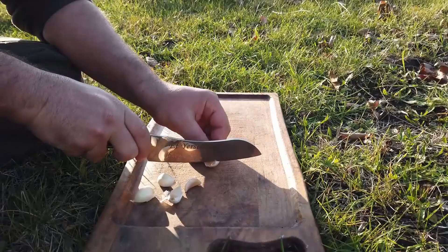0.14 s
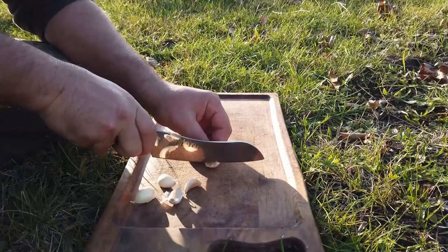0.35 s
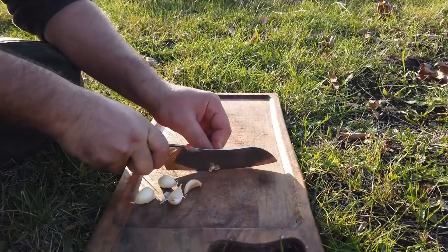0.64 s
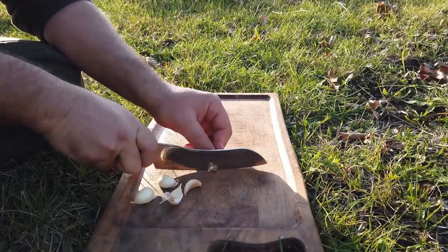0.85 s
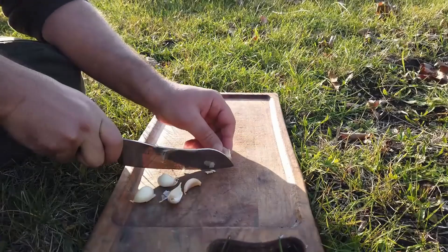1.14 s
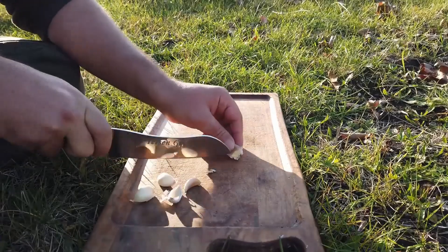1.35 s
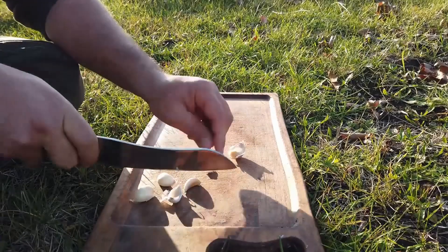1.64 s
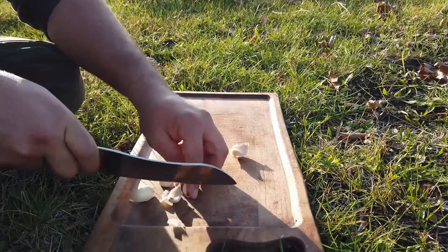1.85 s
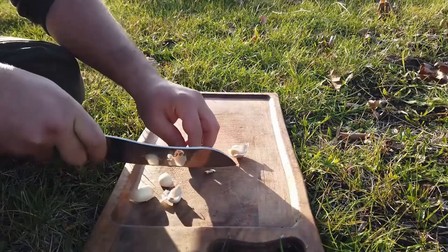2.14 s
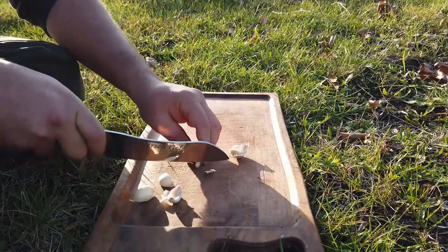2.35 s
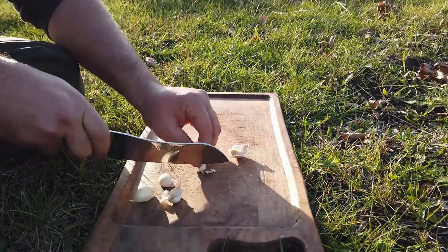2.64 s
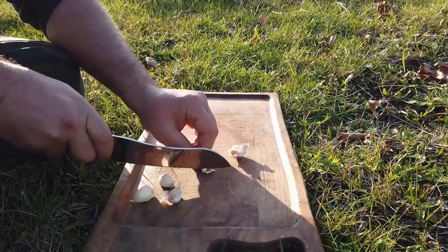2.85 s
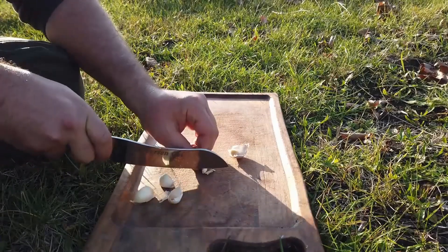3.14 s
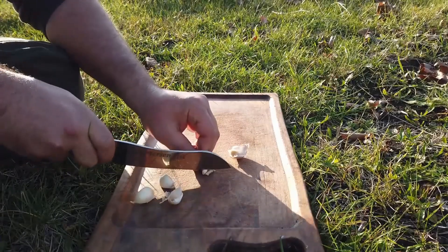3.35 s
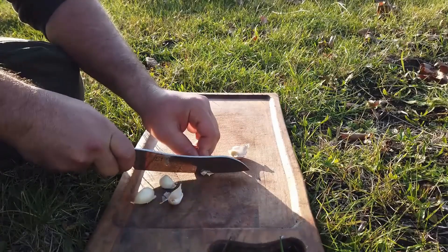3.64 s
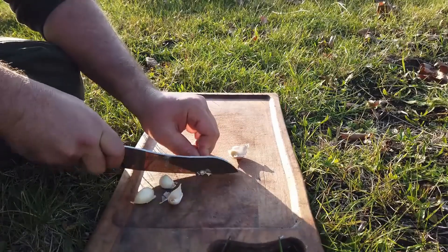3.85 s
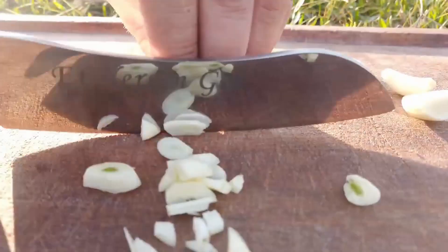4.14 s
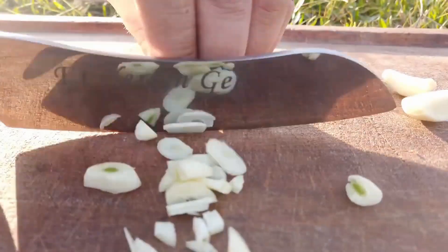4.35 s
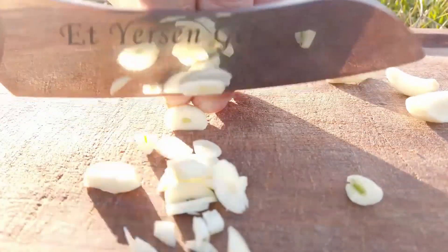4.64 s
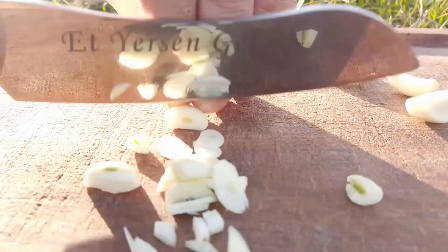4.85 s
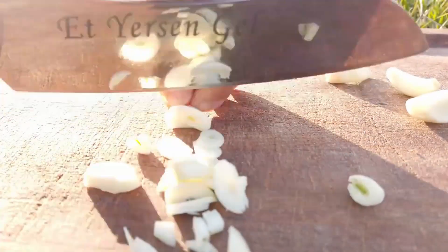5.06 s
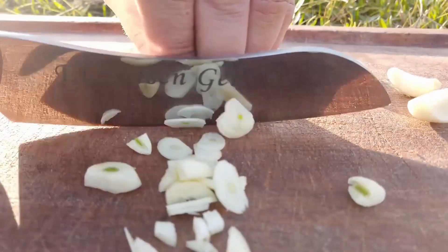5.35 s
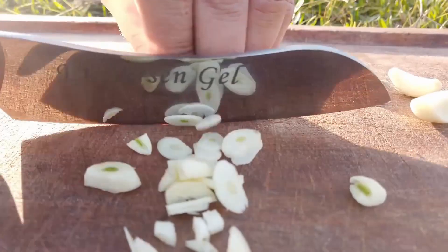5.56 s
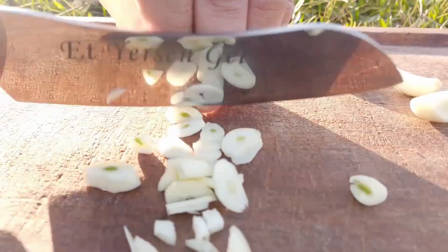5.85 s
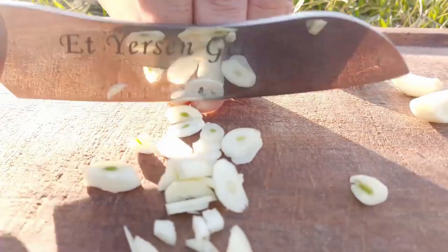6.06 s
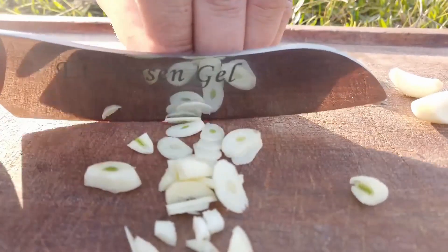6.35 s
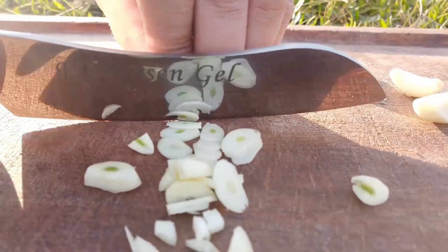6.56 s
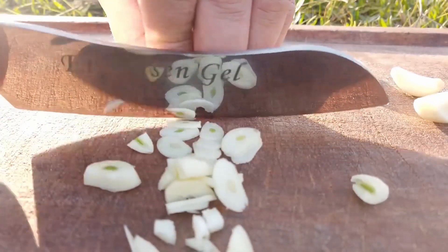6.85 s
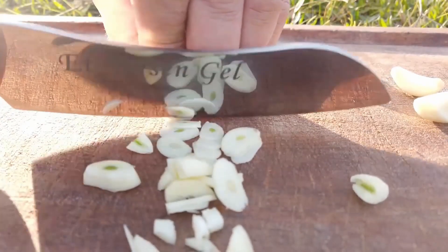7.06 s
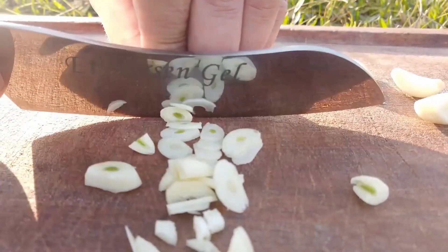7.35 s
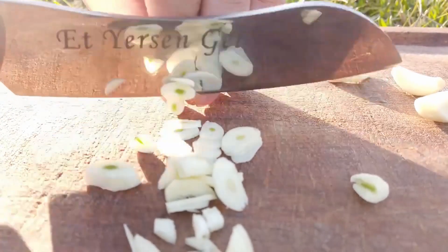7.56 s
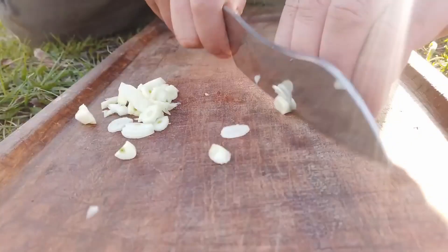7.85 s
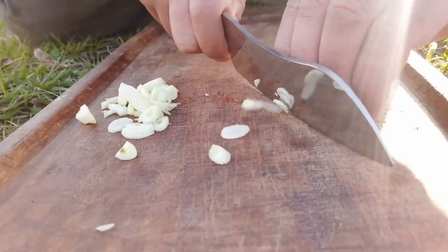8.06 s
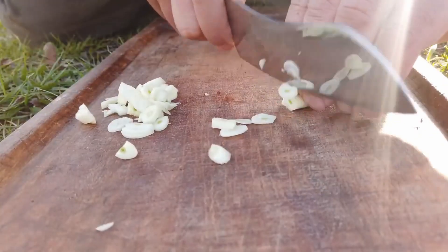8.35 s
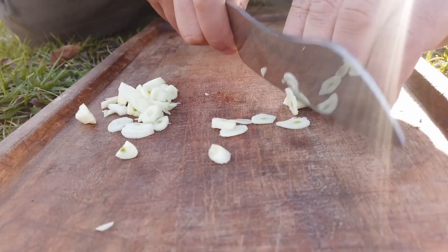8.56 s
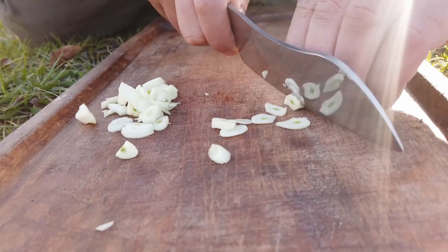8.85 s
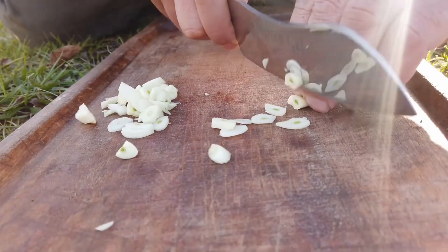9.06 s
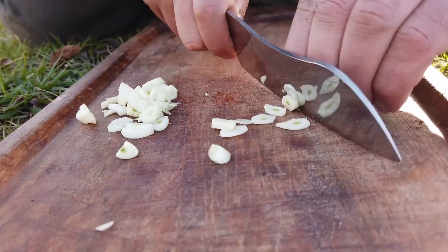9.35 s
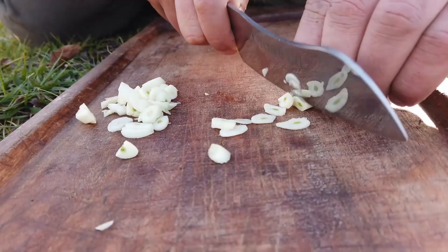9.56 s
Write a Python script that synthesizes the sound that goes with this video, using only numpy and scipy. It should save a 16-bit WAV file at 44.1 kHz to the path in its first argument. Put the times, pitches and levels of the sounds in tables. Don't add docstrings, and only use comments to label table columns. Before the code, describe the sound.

A knife trims garlic with snaps and soft scrapes on a wooden board outdoors, then chops steadily with crisp, hollow knocks over rumbling wind.

```python
import sys
import numpy as np
from scipy import signal
from scipy.fft import rfft, irfft
from scipy.io import wavfile
from scipy.ndimage import uniform_filter1d

SR = 44100
rng = np.random.default_rng(int(sys.argv[2]) if len(sys.argv) > 2 else 0)


def digitize_waveform(pressure):
    field = np.atleast_2d(pressure).T
    bounded = np.clip(field, -1, 1)
    quanta = np.round(bounded * 32767).astype(np.int16)
    wavfile.write(sys.argv[1], SR, quanta)


def invert_db(level):
    return 10 ** (np.asarray(level, dtype=float) / 20)


N = 427769
T = np.arange(N) / SR


def rms_one(x):
    return x / np.sqrt(np.mean(x ** 2) + 1e-20)


def in_time(rows, outside=None):
    s, *columns = np.transpose(rows)
    return [np.interp(T, s, column, outside, outside) for column in columns]


def band(x, low_hz, high_hz, order=2):
    return signal.sosfilt(signal.butter(order, [low_hz, high_hz], "band", fs=SR, output="sos"), x)


def noise_band(low_hz, high_hz, order=2):
    return rms_one(band(rng.standard_normal(N + SR), low_hz, high_hz, order=order)[SR:])


def drift(rate):
    points = rng.standard_normal(400)
    return np.interp(T * rate % 399, np.arange(400), points)


def marks(times, heights):
    out = np.full(N, 1e-18)
    np.add.at(out, np.round(np.asarray(times) * SR).astype(int), heights)
    return out


def dying(clicks, t60):
    return signal.lfilter([1], [1, -invert_db(-60 / (t60 * SR))], clicks)


def resonate(x, peaks):
    out = 0
    for k, (hz, width, level_db) in enumerate(peaks):
        r = np.exp(-np.pi * width / SR)
        rise = [(1 - r * r) / 2, 0, (r * r - 1) / 2]
        ring = signal.lfilter(rise, [1, -2 * r * np.cos(2 * np.pi * hz / SR), r * r], x)
        out = out + (-1) ** k * invert_db(level_db) * ring
    return out


def grains(per_s, spread_db):
    sizes = invert_db(spread_db * np.minimum(rng.exponential(1, N), 4)) * rng.choice([-1, 1], N)
    return rms_one(sizes * (rng.random(N) < per_s / SR))


def friction(source, dull, bright, body):
    parts = []
    for envelope, peaks in zip((dull, bright), body):
        ring = resonate(source * envelope + 1e-18, peaks)
        parts.append(ring / np.std(resonate(source[:SR], peaks)))
    return band(parts[0], 280, 3500, order=4) + parts[1]


def bursts(rows):
    dull, bright, after = np.zeros(N), np.zeros(N), np.arange(4000) / SR
    for s, peak_db, bright_db in rows:
        t60 = 0.026 - .0007 * np.clip(bright_db, -15, 15)
        start = round(s * SR)
        fall = invert_db(peak_db - 10.5 - 60 * after / t60) * np.minimum(after / 0.0015, 1)
        dull[start:start + len(after)] += fall
        bright[start:start + len(after)] += fall * invert_db(bright_db)
    return dull, bright


# time in seconds, level in dB.
AIR = [(0, -62), (1.5, -62.5), (4.17, -63.5), (4.19, -72), (9.7, -72.5)]
# pitch in Hz, level in dB per Hz.
HISS_COLOUR = [(300, -13), (500, -10.5), (800, -9), (1200, -15.5), (2000, -19), (4000, -22.5),
               (6500, -21.5), (10000, -30), (15500, -30.5)]


def air():
    hz = np.maximum(np.fft.rfftfreq(N, 1 / SR), 1)
    colour_hz, colour_db = np.transpose(HISS_COLOUR)
    gain = invert_db(np.interp(np.log(hz), np.log(colour_hz), colour_db)) * (hz > 300)
    hiss = rms_one(irfft(rfft(rng.standard_normal(N)) * gain, N))
    return hiss * invert_db(in_time(AIR)[0])


# time in seconds, level in dB.
ROAD = [(0, -43), (.35, -43), (.6, -46), (.9, -42), (1.1, -49.5), (1.4, -44), (2.5, -49.5), (2.92, -57),
        (3.32, -52), (3.67, -62), (3.94, -54), (4.5, -59.5), (7, -61), (7.94, -49.5), (8.3, -54),
        (8.67, -58), (9.5, -53.5)]
# time in seconds, level in dB.
TYRES = [(0, -88), (1.0, -80), (1.4, -70), (2.3, -62), (2.9, -78), (3.7, -59), (4.3, -65.5), (7.6, -69),
         (8.6, -58), (9.7, -59)]


def traffic():
    road = noise_band(85, 165, order=3) * invert_db(in_time(ROAD)[0])
    return road + noise_band(130, 330) * invert_db(in_time(TYRES)[0])


SPOT_ENDS_S = [4.18, 7.7]
# time in seconds, level in dB.
WIND = [(0.0, -39.5), (0.35, -38), (1.0, -35.5), (1.38, -46.5), (1.84, -35.5), (2.48, -37), (2.65, -42),
        (2.92, -34.5), (3.32, -42.5), (3.8, -37.5), (4.24, -43.5), (4.51, -47.5), (5.0, -46.5),
        (5.65, -44.5), (7.73, -45), (8.67, -48.5), (8.86, -53.5), (9.35, -47)]
BUFFET_DB = [-29, -45, -44]


def wind():
    gust_db = in_time(WIND)[0]
    swing_db = gust_db - gust_db.mean()
    spot_db = np.take(BUFFET_DB, np.searchsorted(SPOT_ENDS_S, T))
    buffet = noise_band(1.97, 14) * invert_db(uniform_filter1d(spot_db, size=4000) + 0.27 * swing_db)
    throb = noise_band(15, 30) * invert_db(-50 + swing_db + 3.0 * drift(3))
    gust = noise_band(31, 67.8) * invert_db(gust_db + 0.63 * drift(9.2))
    opening_offset = -.075 * np.exp(-T / .004)
    return buffet + throb + gust + opening_offset


# middle in seconds, level in dB, quarter of the length in
# seconds.
RUSTLES = [(4.225, -67, .012), (4.435, -65.5, .01), (4.59, -69.5, .015), (4.634, -68, .01),
           (4.79, -67.5, 0.0099), (4.835, -67, .01), (4.993, -76, .012), (5.39, -75, 0.013),
           (5.64, -79, 0.0093), (7.403, -73.5, 0.038), (7.48, -73, 0.033), (7.765, -74.5, 0.011),
           (7.97, -71, 0.0077), (8.15, -69, 0.01), (8.509, -76, 0.009), (9.386, -74, 0.0094)]


def rustles():
    brushing = 0
    for s, level_db, half in RUSTLES:
        brushing = brushing + invert_db(level_db) * np.maximum(1 - np.abs(T - s) / (2 * half), 0)
    return brushing * noise_band(4300, 7000)


# pitch in Hz, width in Hz, level in dB.
SLIDE_RINGS = [(810, 120, -11), (1170, 110, 6.5), (1140, 64, 1.5), (1520, 80, -6)]
# time in seconds, level in dB.
SLIDING = [(7.71, -89), (7.725, -69.5), (7.95, -76), (8.1, -72), (8.8, -81), (8.95, -80), (9.15, -83.5),
           (9.5, -71.5), (9.7, -73)]


def sliding():
    rub = rms_one(resonate(rng.standard_normal(N), SLIDE_RINGS))
    return rub * invert_db(in_time(SLIDING, -150)[0] + 2.0 * drift(12))


# time in seconds, peak in dB,
# pitch in Hz, width in Hz.
TICKS = [(.5075, -44, 3200, 900), (.5415, -52, 6000, 3000), (.5515, -31, 420, 120), (.5517, -26, 1780, 260),
         (.5518, -29, 5000, 700), (.5785, -44, 1500, 900), (.6452, -28, 3300, 400),
         (.6453, -28, 6200, 1500), (.678, -48, 7000, 4000), (.682, -50, 11000, 4000),
         (.697, -46, 11500, 3500), (.7008, -42, 10500, 5000), (.7118, -46, 9000, 5000),
         (.7188, -38, 8000, 4000), (.7303, -33, 6000, 4000), (.7335, -38, 11500, 5000),
         (.8965, -46, 7500, 1500), (.9152, -38, 7700, 500), (1.0505, -40, 10000, 4000),
         (1.066, -38, 5800, 900), (1.078, -44, 9000, 3000), (1.104, -40, 5700, 900),
         (1.153, -48, 7000, 1500), (2.065, -36, 1200, 200), (2.067, -38, 650, 150), (2.129, -48, 1280, 90),
         (2.213, -46, 820, 150), (2.331, -42, 1110, 70), (2.354, -40, 850, 90), (2.4468, -28, 1750, 350),
         (2.447, -32, 860, 120), (2.448, -34, 2700, 700), (2.488, -40, 850, 50), (2.594, -48, 1100, 70),
         (3.6478, -34, 1800, 400), (3.6728, -30, 1750, 300), (3.673, -40, 4800, 1500),
         (3.8425, -44, 7700, 400), (3.8755, -46, 8000, 4000), (4.022, -48, 9500, 3000),
         (4.0296, -34, 5000, 900), (4.2375, -36, 1300, 700), (5.293, -48, 1300, 900), (8.225, -57, 800, 90),
         (8.242, -55, 850, 70), (8.418, -52, 850, 120),
         (.9152, -36, 4500, 1200), (.9155, -40, 1750, 300), (.633, -42, 6300, 2500), (3.85, -40, 450, 250),
          (4.03, -36, 1100, 700), (6.2625, -40, 5200, 2500), (6.281, -42, 1500, 900), (7.85, -66, 1450, 25),
          (7.86, -66, 1080, 30), (8.06, -65, 1200, 25), (8.9055, -48, 7500, 3000), (8.8875, -42, 9500, 700),
          (9.008, -62, 1230, 40)]


def ticks():
    out, after = np.zeros(N), np.arange(3000) / SR
    for s, peak_db, hz, width in TICKS:
        shove = rng.standard_normal(len(after)) * np.exp(-after / .0012)
        ring = resonate(resonate(shove, [(hz, width, 0)]), [(hz, 3 * width, 0)])
        out[round(s * SR):][:len(after)] += invert_db(peak_db) * ring / np.abs(ring).max()
    return out


# pitch in Hz, width in Hz, level in dB.
BLADE = [
    [(545, 160, -10), (866, 44, -3.5), (980, 67, -9), (1120, 58, -3), (1272, 70, -5.5), (1717, 135, -2),
     (2680, 340, -19.5), (3120, 780, -21.5)],
    [(2540, 350, -0.5), (2950, 600, 2), (3423, 67, -1), (4065, 160, -15), (4750, 680, -1.5),
     (5910, 580, -2.5), (6270, 1500, -6), (7980, 480, -7), (9600, 900, -16), (12400, 2500, -35)],
]
# time in seconds, peak in dB, bright part in dB.
SNAPS = [(0.3202, -56, 13), (0.3484, -49.5, 8), (0.378, -48, 14), (0.4856, -45, 3), (0.5077, -40, 4),
         (0.5518, -14, -1), (0.5781, -29, -13), (0.591, -46, 8), (0.6435, -11.5, 4), (0.701, -37, 10),
         (0.717, -30, -2), (0.7309, -24, 7), (0.8959, -48, -5), (0.9128, -29.5, 8.5), (0.9837, -44, 5),
         (1.0503, -29.5, 8), (1.571, -53, 6), (1.9036, -47, -4), (2.0634, -34, -38), (2.2129, -44, -8),
         (2.355, -49, -25), (2.4484, -19, -30), (2.596, -45, -5), (3.1672, -47, -5), (3.6461, -23, -3),
         (3.6711, -22, -1), (3.8424, -24.5, -9), (3.8504, -29.5, 8), (4.0288, -20, 5), (4.1024, -35.5, -4)]
# start in seconds, length in seconds, level in dB, bright part in dB, fade in seconds per 20 dB.
STROKES = [(.28, .24, -69.5, -8, .05), (.535, .02, -62, -15, .04), (.64, .008, -33, -16, .04),
           (.66, .07, -52, 1, .04), (.74, .04, -64, -4, .15), (.94, .1, -51.5, -3, .06),
           (1.05, .06, -49, 3, .04), (1.12, .02, -55, -3, .3), (1.92, .17, -64, -25, .05),
           (2.12, .24, -56.5, -15, .03), (2.45, .02, -49, -30, .07), (2.54, .16, -67, -24, .05),
           (3.53, .12, -62, -4, .05), (3.675, .055, -41, -11, .022), (3.845, .015, -47, -5, .07),
           (3.83, .19, -59.5, -4, .03), (4.04, .065, -52, 0, .03), (4.115, .062, -56, -7, .02)]


def trimming():
    flutter = invert_db(2.0 * drift(45)) * (T < SPOT_ENDS_S[0])
    dull, bright = bursts(SNAPS)
    for start, length, level_db, bright_db, fade in STROKES:
        before = np.maximum((start - T) / .025, 0)
        away = before + np.maximum((T - start - length) / fade, 0)
        pressure = flutter * invert_db(level_db - 20 * np.minimum(away, 10))
        dull, bright = dull + pressure, bright + pressure * invert_db(bright_db)
    return friction(grains(9000, 3.6), dull, bright, BLADE)


FIRM_BLOW_DB, JUICY_DB = -8, -46
# pitch in Hz, width in Hz, level in dB.
CLOVE = [
    [(660, 250, 1), (1131, 190, -2.5), (1335, 196, 0.5), (1890, 280, -7), (430, 200, -8)],
    [(2374, 210, 1), (3020, 260, -7), (4170, 410, -4), (5140, 600, -1), (6160, 1140, -2.5),
     (7600, 1430, -10), (8670, 300, -8), (12000, 2100, -34), (3550, 300, -17)],
]
# time in seconds, peak in dB, bright part in dB.
SKINS = [(5.9944, -63.5, -7), (7.3312, -29, -9), (7.903, -66, -2), (8.6862, -53, 4), (8.8623, -47, -6.5),
         (8.88, -27, -7.5), (8.8864, -25, -0.5), (8.8934, -24, -5), (9.2214, -51, -0.5)]
# landing of the edge in seconds, blow in dB, high modes in dB,
# time in the clove in seconds, crackle in dB.
CHOPS_FRONT = [(4.2605, -10.5, -1, .0235, -42), (4.463, -7.5, 1.5, .02, -43.5),
               (4.6636, -9.5, 6, 0.021, -46), (4.869, -20.5, 11, .029, -43),
               (5.0638, -15.5, 6.5, .025, -44), (5.2644, -8, 2.5, .019, -42.5),
               (5.475, -10, 1.5, 0.02, -42.5), (5.682, -18.5, -1, .029, -43.5),
               (5.8662, -11, 7.5, .023, -50.5), (6.068, -8.5, 2, .02, -55), (6.289, -30, -7, .038, -48.5),
               (6.471, -16, 7, 0.021, -66), (6.6876, -22.5, 7, 0.022, -45), (6.881, -14, -6.5, 0.019, -63),
               (7.111, -17, 7, 0.02, -60.5), (7.4484, -13, -4, .017, -48)]
# landing in seconds, blow in dB, high modes in dB,
# time in the clove in seconds, crackle in dB.
CHOPS_SIDE = [(7.788, -5, 2.5, .015, -42), (7.991, -8.5, 2, .024, -43), (8.1691, -7, 2, .017, -42.5),
              (8.366, -9, 2.5, .017, -41.5), (8.5494, -11.5, 0, .022, -41.5), (8.7195, -8, 2, 0.015, -55.5),
              (9.0739, -13, 0.5, .022, -45), (9.2553, -7.5, 2.5, .012, -54), (9.4219, -13, -2, 0.016, -63),
              (9.6004, -16, -7.5, 0.029, -49.5)]
CUT_DULL_DB = [3, 6.5]


def cuts():
    dull, bright = bursts(SKINS)
    for chops, dull_db in zip((CHOPS_FRONT, CHOPS_SIDE), CUT_DULL_DB):
        for end, blow_db, _, length, crackle_db in chops:
            inside = slice(round((end - length) * SR), round(end * SR))
            since = T[inside] - end + length
            early_split_db = .8 * max(JUICY_DB - crackle_db, 0) * max(blow_db + 13.5, 0)
            swell_db = 4 - early_split_db
            bright[inside] = invert_db(crackle_db + swell_db * (since / length - .35))
            bright[inside] *= np.clip(since / 0.001, 0, 1)
            dull[inside] = bright[inside] * invert_db(dull_db + .22 * (blow_db - FIRM_BLOW_DB))
    lumps = invert_db(2.6 * drift(350))
    return friction(grains(5000, 4.03), dull * lumps, bright * lumps, CLOVE)


# time in seconds, blow in dB, low modes in dB, high modes in dB, crack in dB.
TOUCHES = [
    (0.656, -5, -2.5, -6.5, -40),
    (2.063, -29.5, -16, 0.5, -66),
    (2.354, -40, -18, 4.5, -63),
    (2.446, -36, -22, 0.5, -80),
    (2.494, -34.5, -18, -10, -67),
    (3.876, -32.5, 11.5, -17.5, -47),
    (7.332, -37, -1.5, 8, -54),
]
FLATNESS_DB = [-2.5, 0.1, 0.1, 0.1, 0.1, 0.1, -4, 2, 0.1, 1, 4.5, 1, 3.5, 1, 0.1, 0.1, 1, -1, -0.5, 0.1,
               0.1, 0.1, 0.1, 0.1, 0.1, 0.1]
SPLINTER_DB = [0.1, 0.1, 0.1, 0.1, 0.1, 0.1, 6, -5, 3, 6, 0.1, 6, -8, 0.1, -8, 2, -4, -5, -5, -8, -1.5, 0.1,
               -7, 0.1, -7, 0.1]


def blows_on_board():
    s, blow_db, high_db, _, crackle_db = np.transpose(CHOPS_FRONT + CHOPS_SIDE)
    firmer_db = blow_db - FIRM_BLOW_DB
    low_db = 2.5 + np.array(FLATNESS_DB) - .5 * firmer_db
    crack_db = -40.5 + np.array(SPLINTER_DB) + .5 * firmer_db + .4 * (crackle_db - JUICY_DB)
    rows = np.vstack([np.transpose([s, blow_db, low_db, high_db, crack_db]), TOUCHES])
    s, blow_db, low_db, high_db, crack_db = rows[np.argsort(rows[:, 0])].T
    rattle_db = -5 - 0.65 * (blow_db - FIRM_BLOW_DB)
    s = s - .0003
    return s, blow_db, low_db, high_db, crack_db, rattle_db


# low Hz, high Hz, level in dB, seconds to fall 60 dB, extra from the side in dB.
AFTER = [(300, 640, -36, 0.19, 0.1), (550, 1060, -46, 0.32, -2), (1200, 2000, -49, 0.07, -2),
         (2470, 8000, -62, 0.07, -7)]


def slices_rattle():
    s, blow_db, _, _, _, rattle_db = blows_on_board()
    from_side = np.searchsorted(SPOT_ENDS_S, s) == 2
    lumps, out = invert_db(3.5 * drift(60)), 0
    for low_hz, high_hz, level_db, t60, side_db in AFTER:
        starts = marks(s + 0.0061, invert_db(blow_db + rattle_db + level_db + side_db * from_side + 4.5))
        out = out + noise_band(low_hz, high_hz, order=3) * lumps * dying(starts, t60)
    return out


# pitch in Hz, width in Hz, dB over the blow.
EDGE = [(1900, 400, -22), (2450, 350, -21), (3100, 450, -26)]


def landings():
    s, blow_db, _, high_db, crack_db, _ = blows_on_board()
    bite = resonate(marks(s + .0003, invert_db(blow_db + high_db + 20)), EDGE)
    held = uniform_filter1d(marks(s + 0.0013, invert_db(crack_db + 9.5)), size=130)
    crack = dying(held, 0.0073)
    return bite + friction(grains(6000, 8.1), 2.0 * crack, crack, CLOVE)


# pitch in Hz, level in dB, seconds to fall 60 dB, direction and size of the motion.
BOARD_FAR = [(150, -28, 0.039, 1), (230, -13.5, 0.02, 1), (438, -14.5, .07, -1), (601, -11.5, 0.035, -1.2),
             (723, -12.5, 0.017, 1), (775, -11.5, 0.044, -1), (920, -9, 0.0245, 1),
             (1100, -10.5, 0.065, -1.4), (1634, -15.5, 0.072, 1), (2940, -32, 0.024, -1.6)]
# Hz, dB, seconds to fall 60 dB, direction and size of the motion.
BOARD_FRONT = [(93, -26.5, 0.11, 0.77), (171, -21.5, .06, 1), (323.6, -21.5, 0.072, -1.06),
               (381, -9, 0.045, -0.95), (477.8, -9, 0.069, -0.63), (573, -12, 0.027, -1.4),
               (644.5, -8.5, 0.054, -0.54), (731.4, -1.5, 0.029, 0.87), (740, -9.5, 0.0037, 0.37),
               (1171, -18, 0.024, 1), (1390, -26, 0.023, 0.86), (1610, -23.5, 0.019, 0.62),
               (2480, -26, 0.051, 0.61), (3940, -43, 0.0052, 1)]
# Hz, dB, seconds to fall 60 dB, direction and size of the motion.
BOARD_SIDE = [(88.5, -27.5, 0.23, 0.49), (192.4, -23.5, 0.069, 1), (308.5, -8, 0.045, 0.69),
              (388.3, -8.5, 0.04, -0.82), (448.5, -14.5, 0.075, 0.55), (541, -6, 0.024, -1.31),
              (677, -2.5, 0.044, -1.08), (740, -4.5, 0.041, 0.9), (829, -14, 0.079, 1),
              (935, -16, 0.057, 1), (1074, -17, 0.026, -1.3), (1112, -12, 0.025, 0.91),
              (1254, -6.5, 0.027, 0.63), (1598, -8, 0.02, -0.55), (1763, -15, 0.023, 0.95),
              (2114, -24, 0.047, -0.13), (2850, -42, .018, -1.2)]
FACING = [-1, 1, 1]


def knocks(contact_hz=550):
    s, blow_db, low_db, high_db, _, _ = blows_on_board()
    spot, out = np.searchsorted(SPOT_ENDS_S, s), np.zeros(N)
    chance = rng.normal(0, 1, (len(s), 18))
    for k, modes in enumerate((BOARD_FAR, BOARD_FRONT, BOARD_SIDE)):
        here = spot == k
        heard = slice(int(s[here][0] * SR), int((s[here][-1] + .2) * SR))
        for j, (hz, level_db, t60, way) in enumerate(modes):
            part_db = low_db if hz < 520 else high_db if hz > 1000 else 0 * s
            strength = invert_db(blow_db + level_db + part_db + 3.5 + 1.2 * chance[:, j])
            blows = marks(s, here * FACING[k] * way * strength)
            r = invert_db(-60 / (min(t60, 40 / hz) * SR))
            w = 2 * np.pi * hz / SR
            ring = signal.lfilter([0, np.sin(w)], [1, -2 * r * np.cos(w), r * r], blows[heard])
            out[heard] += np.hypot(1, hz / contact_hz) * ring
    soft = np.exp(-2 * np.pi * contact_hz / SR)
    return signal.lfilter([1 - soft], [1, -soft], out)


def scene():
    background = air() + traffic() + wind()
    hands = rustles() + sliding() + ticks() + trimming()
    chops = cuts() + slices_rattle() + landings() + knocks()
    return (background + hands + chops)[None]


def band_limit(x):
    return signal.sosfilt(signal.butter(12, 16450, fs=SR, output="sos"), x)


def record(dry):
    dry = dry + invert_db(-84.5) * noise_band(8000, 18000)
    rounded = 0.73 * np.tanh(dry / 0.89)
    top_cut = signal.cheby2(10, 50, 16350, fs=SR, output="sos")
    return band_limit(signal.sosfilt(top_cut, rounded))


dry = scene()
out = record(dry)
digitize_waveform(out)
```